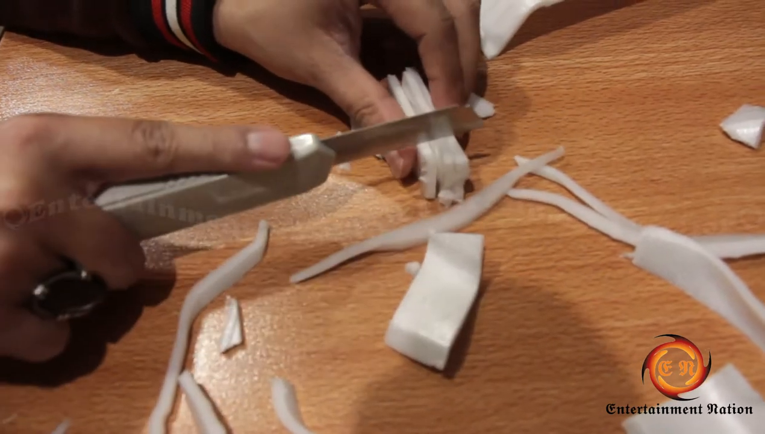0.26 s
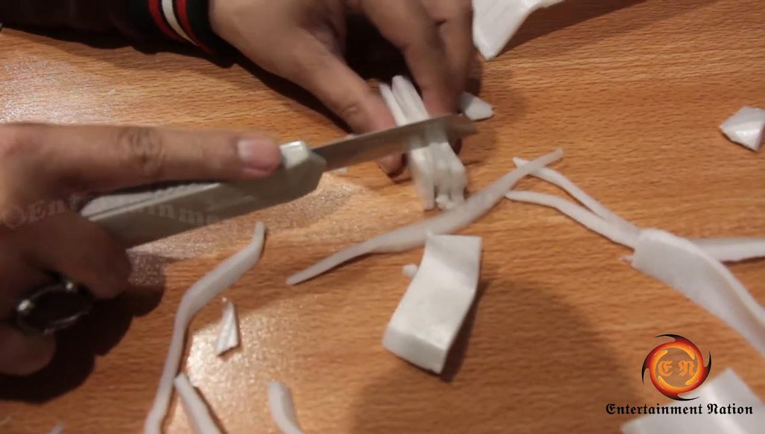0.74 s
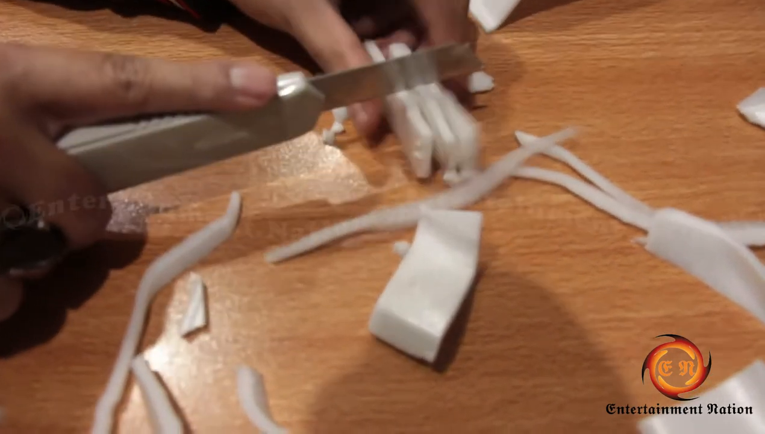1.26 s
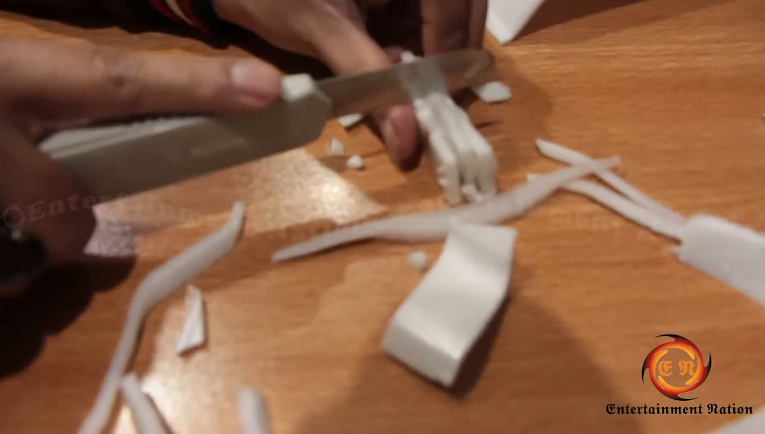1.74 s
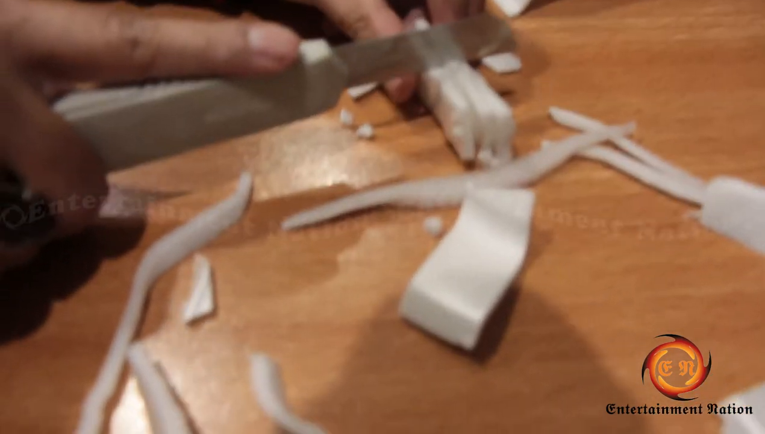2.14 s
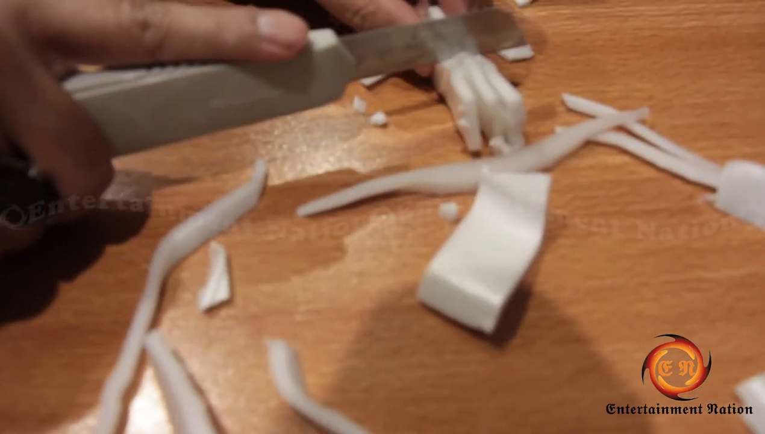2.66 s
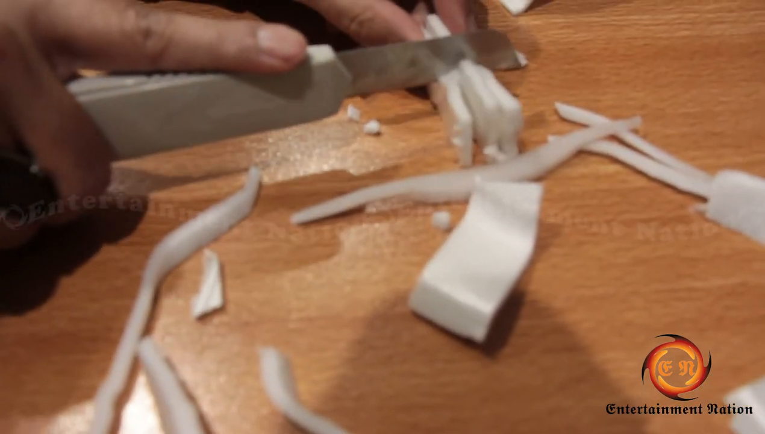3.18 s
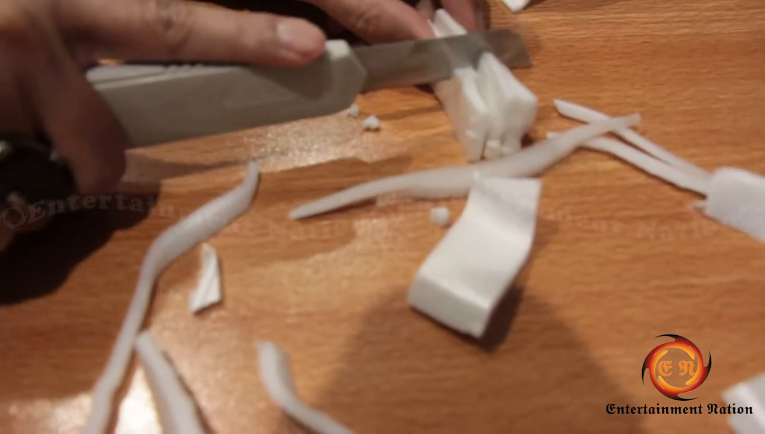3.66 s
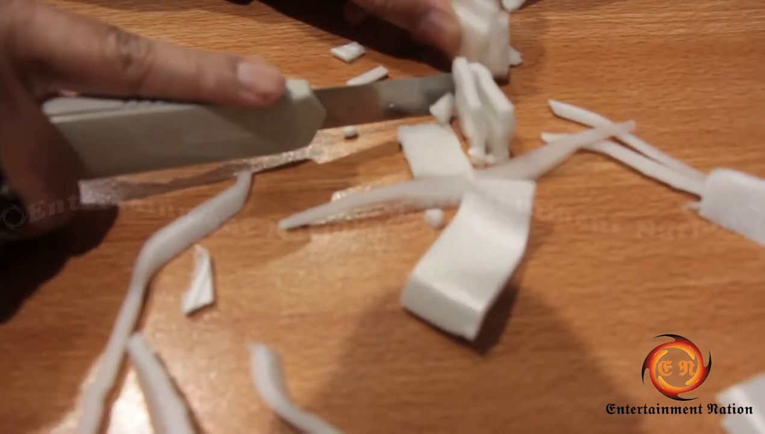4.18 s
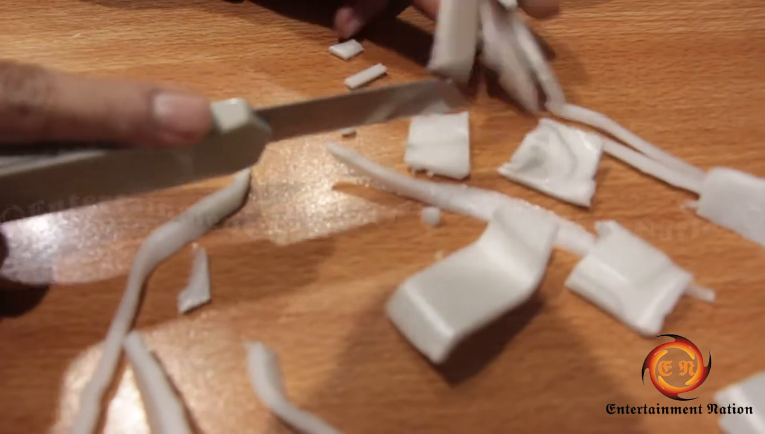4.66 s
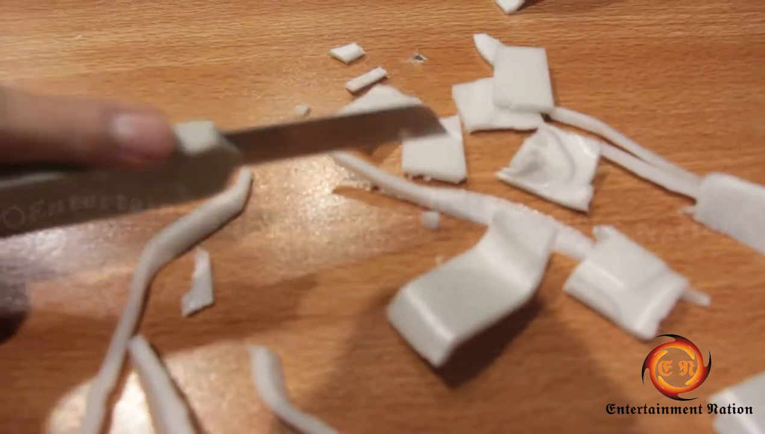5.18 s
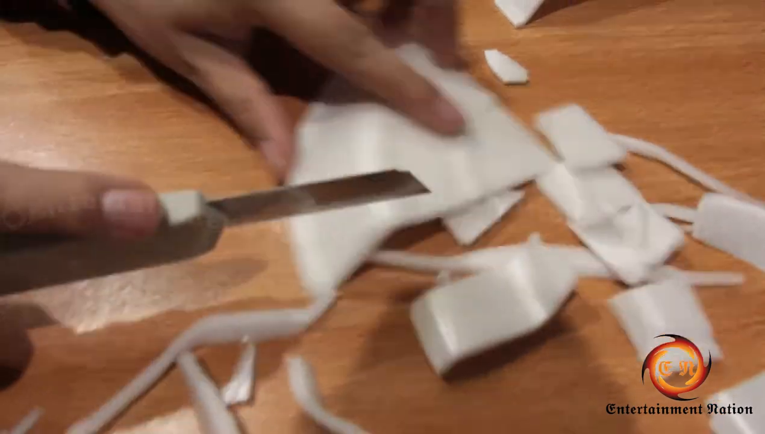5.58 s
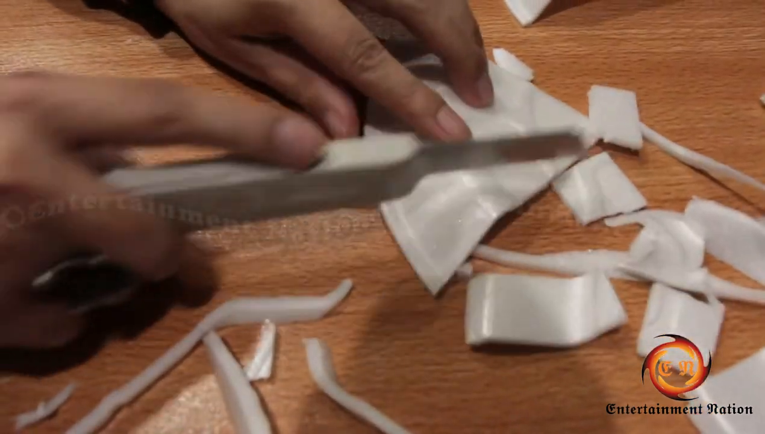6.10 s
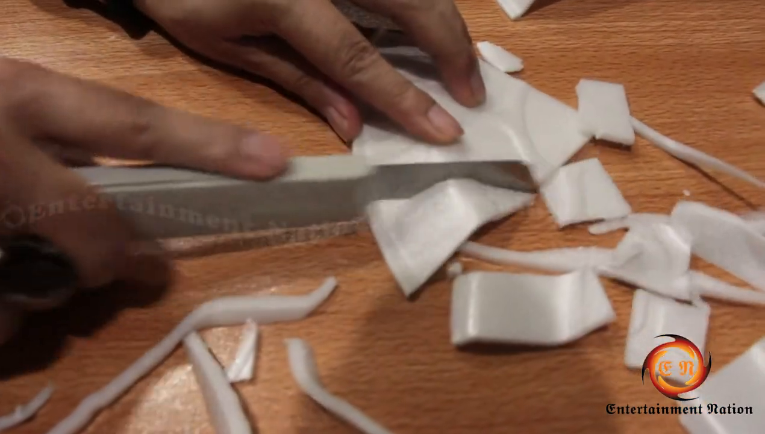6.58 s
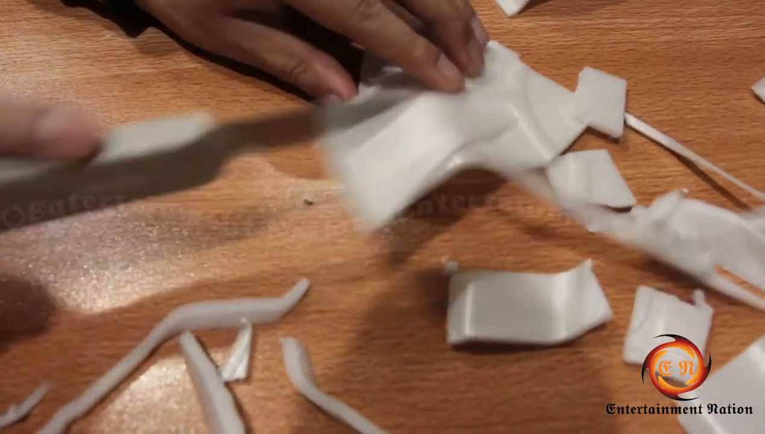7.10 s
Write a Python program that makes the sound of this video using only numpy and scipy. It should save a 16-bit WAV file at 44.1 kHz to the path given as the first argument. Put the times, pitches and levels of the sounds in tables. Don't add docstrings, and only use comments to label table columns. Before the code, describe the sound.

Close, dry foam cutting: small scrapes and ticks build to sharp snaps, a pause, then harsh squeaky rips through a plate, with soft table knocks.

```python
import sys
import numpy as np
from scipy import signal
from scipy.fft import rfft, irfft, next_fast_len
from scipy.io import wavfile
from scipy.ndimage import uniform_filter1d, map_coordinates

SR = 44100
rng = np.random.default_rng(int(sys.argv[2]) if len(sys.argv) > 2 else 0)


def magnitude_from_level(level_db):
    exponent = np.asarray(level_db, float) / 20
    return 10 ** exponent


def wav_record(signal):
    frames = np.transpose(np.atleast_2d(signal))
    bounded = np.clip(frames, -1, 1)
    quanta = np.round(bounded * 32767).astype(np.int16)
    wavfile.write(sys.argv[1], SR, quanta)


N = 323694

# pitch_hz, width_hz, level_db
TABLE_MODES = [(123.3, 20, 1.5), (240, 71, -5), (394, 17.3, -2), (566, 104, -9.5), (768, 97, -10),
               (1200, 260, -15)]


def unit(x):
    return x / np.sqrt(np.mean(x ** 2) + 1e-20)


def along(points, hz, order=1):
    cols = np.transpose(points)
    return np.interp(np.log(hz + 1), np.log(cols[0] + 1), cols[order])


def curves(rows):
    s, *cols = np.transpose(rows)
    return [np.interp(np.arange(N) / SR, s, c) for c in cols]


def wobble(rate):
    coarse = np.arange(0, N + 32, 32)
    knots = rng.standard_normal(int(N * rate / SR) + 8)
    return np.interp(np.arange(N), coarse, map_coordinates(knots, [coarse * rate / SR]))


def filtered(x, response):
    m = next_fast_len(x.shape[-1] + 2048)
    spectrum = rfft(x, m) * response(np.fft.rfftfreq(m, 1 / SR))
    return irfft(spectrum, m)[..., :x.shape[-1]]


def body(modes):
    def response(f):
        total = 0
        for k, (c, w, db) in enumerate(modes):
            total = total + (-1) ** k * magnitude_from_level(db) * 1j * f * w / (c * c - f * f + 1j * f * w)
        return total
    return response


def room_tone():
    # pitch_hz, density_db
    rumble_colour = [(25, -50), (42, -12.5), (90, -9), (150, -3.5), (240, -5.5), (330, -11), (450, -18.5),
                     (800, -29.5), (1500, -63)]
    t = np.arange(N) / SR
    hum = magnitude_from_level(-54.0 + 1.3 * wobble(6.5)) * np.sin(2 * np.pi * 120 * t + 0.64 * wobble(3.62))
    hum += magnitude_from_level(-77.5 + 1.5 * wobble(6.3)) * np.sin(2 * np.pi * 236 * t + 0.62 * wobble(9.2))
    noise = rng.standard_normal((3, N))
    shared = noise[0] + 0.78 * noise[1:]
    rumble = unit(filtered(shared, lambda hz: magnitude_from_level(along(rumble_colour, hz))))
    return hum + magnitude_from_level(-55.0 + 0.24 * wobble(4.73)) * rumble


def hiss():
    # pitch_hz, density_db
    hiss_colour = [(200, -34), (500, 3), (1500, -5), (4000, -10.5), (8000, -17.5), (13000, -22.5),
                   (16000, -27)]
    noise = rng.standard_normal((2, N))
    return magnitude_from_level(-56.0) * unit(filtered(noise, lambda hz: magnitude_from_level(along(hiss_colour, hz))))


def contact():
    # start_s, rub_db, fade_s (per 20 dB), lean_db, keen_db
    bites = [(0.186, -44, 0.13, 0, 2), (0.263, -40.5, 0.08, -2.5, 1), (0.375, -40, -0.27, -6, -7),
             (0.669, -42, 0.23, 3, -1.5), (1.073, -47, 0.06, 0, 13), (1.247, -45, 0.09, -6, 0),
             (1.502, -42, -0.6, 1, -6), (2.395, -44.5, 0.2, -5, -4), (2.54, -44.5, 0.13, -4.5, 4.5),
             (2.793, -41.5, 0.2, -7, -11.5), (2.951, -47, 0.5, -4, -7), (2.99, -34.5, 0.25, -13, -1),
             (3.199, -24, 0.1155, -13, 1), (3.431, -31.5, 0.11, -12.5, -6), (4.037, -33.5, 0.1876, 4, -2),
             (4.06, -37.5, 0.16, -1, -18), (4.324, -50.5, 0.2, 0.5, 6.5), (4.747, -63.5, 0.6, -14, 12.5),
             (6.25, -35, 0.16, -5, -12), (3.225, -49.5, 0.25, 5.5, 10.5), (4.605, -61.5, 0.34, -7, 17),
             (5.869, -41, .3, -2, -3), (6.787, -41, 0.27, -8, -3), (1.572, -48, 0.23, -7, 2),
             (3.609, -45.5, 0.22, -3.5, 1.5), (3.566, -43, 0.09, -3.5, 7), (6.222, -44.5, 0.34, 4, -11)]
    # peak_s, rub_db, rise_s, fade_s (both per 20 dB), lean_db
    draws = [(0, -62, .1, 0, 6), (.11, -55, 6, .07, -3.5), (.551, -47.5, 0.3, 0.2, -1.5),
             (.85, -46, 0.5, -0.1, -4), (.986, -56.5, 0.6, 0.5, -5.5), (1.17, -55.5, 0, 0.05, -2),
             (1.592, -47.5, 0.24, 0.3, -2.5), (1.825, -56, 0.5, -0.1, 3), (2.083, -43.5, 0.14, 0.1, -0.5),
             (2.327, -52, 0.37, 0.07, -1.5), (2.67, -49.5, 0, 0.1, -22.5), (3.17, -54, 0, 0, -9),
             (3.626, -39, 0, 0.04, -1), (3.801, -33, 0.04, 0.1351, -12), (3.971, -35, 0.13, 0.05, -12),
             (4.023, -14.5, 0.02, 0.0033, -7.5), (4.51, -59, 0.5, 0.24, -3)]
    # time_s, rub_db, lean_db
    long_pulls = [
        [(1.333, -51.5, 5), (1.355, -49, 1.5), (1.385, -53.5, 2), (1.43, -48, 3.5), (1.444, -49.5, 1),
         (1.46, -62, 8)],
        [(5.289, -41, 3), (5.36, -29.5, -1), (5.408, -32.5, -4.5), (5.57, -32, -2), (5.595, -28.5, -4),
         (5.608, -27, -2.5), (5.63, -32.5, -0.5), (5.7, -43.5, -1), (5.8, -68, -18)],
        [(5.9, -53, -7), (5.94, -36.5, 6.5), (6.0, -39.5, 2), (6.055, -39, 4.5), (6.075, -46, 3.5),
         (6.11, -51, 3), (6.2, -61, -6.5)],
        [(6.375, -54, -2), (6.405, -30, 2.5), (6.457, -37, -1), (6.581, -36, -1), (6.617, -29, 1),
         (6.645, -36, 2), (6.769, -35, 5), (6.797, -27.5, -1), (6.948, -39, 6)],
        [(6.945, -42, 9.5), (6.96, -42, 10.5), (7.004, -51.5, 11.5), (7.08, -44.5, 2.5), (7.172, -60, 2.5),
         (7.236, -69, 0), (7.339, -54.5, -6)],
    ]
    bite_s = .005
    usual_db, rest_db = -37.5, -81
    t = np.arange(0, N / SR + .01, .001)

    def ramp(s, db, rise, fade):
        return db - 20 * np.maximum((s - t) / max(rise, .002), (t - s) / max(fade, .01))

    moves = [(ramp(s, db, bite_s, fade), lean, keen) for s, db, fade, lean, keen in bites]
    moves += [(ramp(s, db, rise, fade), lean, 0) for s, db, rise, fade, lean in draws]
    for s, db, lean in map(np.transpose, long_pulls):
        level = np.interp(t, [s[0] - bite_s, *s, s[-1] + bite_s], [-120, *db, -120])
        moves.append((level, np.interp(t, s, lean), 0))

    power = magnitude_from_level(2 * rest_db)
    for db, lean, keen in moves:
        fizz = usual_db + 1.11 * (db - usual_db) - 7 + 0.21 * lean + keen
        drag = usual_db + 0.81 * (db - usual_db) - 8 + lean + 0.25 * keen
        power = power + magnitude_from_level(2 * np.array([db, db + lean, fizz, drag]))
    return curves(np.transpose([t, *10 * np.log10(power)]))


def slips(rate, life, spread_db, smooth):
    turns = np.cumsum(rate * magnitude_from_level(2.8 * wobble(40)) / SR)
    at = np.diff(np.floor(turns), prepend=0)
    sizes = at * magnitude_from_level(spread_db * rng.standard_normal(N))
    u = np.arange(SR // 40) / SR / life
    return smooth + unit(signal.fftconvolve(sizes, u * np.exp(-u))[:N])


def rub(force, colour, own_db, patchy_db):
    tearing = force * magnitude_from_level(own_db * wobble(70)) * rng.standard_normal(N)
    hz, t, z = signal.stft(tearing, SR, nperseg=512)
    patches = uniform_filter1d(uniform_filter1d(rng.standard_normal(z.shape), 2, 0), 9, 1)
    gain = colour(hz[:, None], t) * magnitude_from_level(patchy_db * unit(patches))
    gain /= np.sqrt(np.mean(np.abs(gain) ** 2, axis=0))
    return unit(signal.istft(z * gain, nperseg=512)[1][:N])


def sawing():
    # multiple_of_centre, width (same unit), level_db
    strip_modes = [(1, 0.13, 2), (1.4, 0.55, -0.5), (1.9, 0.99, -4)]
    plate_modes = [(.8, 0.28, -6.5), (1, 0.12, 4.5), (1.3, 0.39, -4)]
    drag_modes = [(.7, 0.54, -10), (1, 0.18, 1), (1.27, 0.21, -3.5)]
    # pitch_hz, density_db
    fizz_colour = [(4410, -10.5), (7500, -1.5), (10400, -3.5), (15300, -24), (16100, -26), (16500, -49)]
    # time_s, strips_hz, plate_hz, drag_hz
    stack_sizes = [(0, 3900, 2380, 1300), (.75, 3910, 2340, 1390), (2.1, 4270, 2610, 1370),
                   (2.8, 3650, 2460, 1250), (3.05, 3520, 2650, 1180), (3.22, 3700, 2750, 880),
                   (3.36, 3800, 2930, 920), (3.45, 3720, 2600, 1060), (3.75, 3860, 2520, 1210),
                   (4.0, 3900, 2490, 1230), (4.06, 3180, 2300, 1480), (4.24, 3240, 1770, 1340),
                   (4.4, 3780, 2410, 1200)]
    plate_sizes = [(5.3, 3500, 2620, 1260), (5.37, 3540, 2430, 1280), (5.42, 3350, 2470, 1300),
                   (5.55, 3500, 2300, 1440), (5.61, 3200, 2100, 1480), (5.7, 3080, 2520, 1450),
                   (5.93, 3240, 2240, 1490), (6.1, 3660, 2100, 1490), (6.4, 3520, 2860, 1300),
                   (6.45, 3930, 2760, 1350), (6.6, 4300, 2250, 1420), (6.8, 4120, 2440, 1320),
                   (7.0, 4000, 2200, 1420), (7.06, 3870, 2620, 1370), (7.15, 3780, 2500, 1300)]
    rub_db, plate_db, fizz_db, drag_db = contact()
    force = slips(rate=190, life=0.0025, spread_db=3.0, smooth=1.15)
    s, strips_hz, plate_hz, drag_hz = np.transpose(stack_sizes + plate_sizes)

    def moving(modes, centre):
        return lambda hz, t: body(modes)(hz / np.interp(t, s, centre))

    out = magnitude_from_level(rub_db) * rub(force, moving(strip_modes, strips_hz), own_db=1.5, patchy_db=2.5)
    out += magnitude_from_level(plate_db) * rub(force, moving(plate_modes, plate_hz), own_db=2.0, patchy_db=2.0)
    drag = magnitude_from_level(drag_db) * rub(force, moving(drag_modes, drag_hz), own_db=1.6, patchy_db=2.1)
    out += drag + magnitude_from_level(17.0) * filtered(drag, body(TABLE_MODES[2:3]))
    fizz = rub(force, lambda hz, t: magnitude_from_level(along(fizz_colour, hz)), own_db=3.0, patchy_db=2.0)
    out += magnitude_from_level(fizz_db) * fizz
    return magnitude_from_level(-0.5) * out


def pips():
    # start_s, peak_db, pitch_hz, t60_s
    flaps = [(4.082, -26.5, 2100, .02), (0.013, -52, 1140, 0.29), (4.43, -42, 2490, 0.038),
             (4.445, -51, 2460, .04), (6.399, -25.5, 3030, 0.026), (6.7564, -27, 2290, 0.027),
             (6.7719, -21, 2260, 0.021), (6.7864, -20.5, 2200, 0.042), (6.817, -22, 2260, 0.043),
             (6.8632, -22.5, 2120, 0.023), (6.902, -38, 2350, .04), (6.951, -28, 2340, 0.064),
             (6.962, -28, 2330, .04), (7.0582, -18, 2800, 0.0089), (7.065, -34, 2730, 0.023),
             (7.101, -37, 2550, 0.022), (2.067, -39, 3140, .025), (2.55, -46.5, 1620, 0.098),
             (3.987, -44, 1260, .04), (4.16, -45, 3300, .12)]
    out, t = np.zeros(N + SR), np.arange(SR // 12) / SR
    for s, db, hz, t60 in flaps:
        drift = 0.081 * np.cumsum(rng.standard_normal(len(t)))
        envelope = magnitude_from_level(-60 * t / max(t60, .005)) * (1 - magnitude_from_level(-60 * t / 0.007))
        pip = envelope * np.sin(2 * np.pi * hz * t + drift)
        out[round(s * SR):][:len(t)] += magnitude_from_level(db) * pip / np.abs(pip).max()
    return out[:N]


def snaps():
    # start_s, peak_db, ring_hz, dull_db (re peak)
    saw_snaps = [(.1839, -30, 4120, -15), (.1994, -27.5, 4060, -22), (.2622, -15.5, 2300, -15),
                 (.369, -29.5, 4330, -14), (.3894, -32.5, 4140, -10), (.5002, -27, 4170, -19),
                 (.7637, -26.5, 2470, -7), (1.072, -32, 4530, -7), (1.2395, -21, 2330, -25),
                 (1.498, -27.5, 3230, -16), (1.6795, -27, 3420, -16), (1.6916, -26, 3300, -17.5),
                 (1.9539, -36, 7200, -18), (1.9863, -29, 6100, -28), (2.0357, -29, 4800, -13),
                 (2.0832, -24.5, 5110, -5), (2.1026, -24.5, 2580, -16), (2.329, -30, 2500, -16),
                 (2.39, -21, 4870, -19), (2.5355, -25, 5630, -20), (2.6578, -29.5, 3900, -31),
                 (2.788, -24, 5930, -35), (2.7989, -20, 6000, -36), (2.8063, -23.5, 6050, -26),
                 (2.8603, -25.5, 4570, -15)]
    break_snaps = [(2.778, -43, 6040, -28), (2.917, -38, 6000, -30), (2.9466, -23, 4520, -18),
                   (2.96, -28, 5000, -23), (2.968, -24, 5500, -20), (2.991, -16, 5000, -16),
                   (3.049, -28, 4500, -26), (3.345, -28, 3900, -16), (3.594, -28, 2600, -13),
                   (3.621, -31, 5000, -18), (3.82, -24, 4380, -14), (3.833, -21, 4560, -12),
                   (3.859, -25, 3830, -18), (3.871, -39, 4020, -18), (3.9628, -36, 4520, -20),
                   (3.9812, -20, 3620, -15), (4.2342, -35, 5350, -13), (4.264, -36, 5000, -21),
                   (4.355, -33, 2470, 3), (4.392, -39, 4500, -23), (4.4866, -38.5, 4160, -20),
                   (2.982, -3, 5000, -30.5), (3.1929, -1.5, 3920, -24), (3.2074, -3.5, 3700, -21),
                   (3.265, -19.5, 4180, -18), (3.414, -30, 4000, -43), (3.4255, -9, 3800, -26),
                   (3.7797, -14.5, 3680, -20.5), (3.898, -19, 3880, -19.5), (3.9309, -20.5, 3970, -25),
                   (4.0092, -5, 3750, -20), (4.249, -35, 2440, -8.5), (4.318, -30.5, 2380, 11),
                   (4.5016, -28, 4800, -8), (4.543, -41, 4200, -21.5), (4.7425, -34, 5800, 0),
                   (4.765, -38, 5000, 1), (4.798, -42, 9050, -29)]
    plate_snaps = [(5.2848, -20.5, 2850, -14), (5.3614, -14.5, 3210, -9), (5.4156, -20, 3540, -29),
                   (5.488, -32, 3520, -15), (5.5867, -14, 2510, -30), (6.2461, -10, 4970, -13),
                   (6.2495, -11, 3150, -15), (6.3853, -22, 2920, -16), (6.4064, -16, 4200, -17),
                   (6.4132, -15, 3030, -26), (6.4895, -14.5, 4330, -20), (6.6148, 0, 2240, -10.5),
                   (6.617, -6.5, 2100, -3), (6.7236, -16.5, 2100, -24), (6.788, -14.5, 5000, -25),
                   (6.5165, -19, 6500, -11), (6.797, -10, 3400, -32), (6.8087, -12, 2260, -25),
                   (6.8364, -12, 3880, -38), (7.0573, -24, 4200, -32), (7.3047, -36.5, 4680, -7)]
    # start_s, peak_db, ring_hz, dull_db (re peak)
    keen_snaps = [(1.0799, -30.5, 2540, -6), (1.088, -39, 4000, -8), (1.1612, -34.5, 4400, -20),
                  (1.17, -34.5, 3000, -12), (1.181, -38, 4000, -13), (1.3503, -32, 2500, -1),
                  (1.491, -31.5, 8800, -11), (1.67, -42, 5000, -24), (3.105, -32, 4030, -15),
                  (3.203, -32, 4000, -29), (3.217, -24, 4500, -22), (3.394, -38, 5000, -22),
                  (3.492, -29, 4000, -25), (3.51, -31, 5000, -22), (3.5612, -21, 3950, -16),
                  (3.6041, -20.5, 2400, -27), (3.6341, -24.5, 3820, -13), (3.771, -27, 4000, -23),
                  (3.8037, -15.5, 4030, -18), (3.9413, -21, 4500, -17.5), (5.3442, -16, 6260, -20),
                  (6.136, -28, 3020, -10), (6.24, -26, 2500, -8), (6.322, -32, 3000, -6),
                  (6.6, -16, 7000, -7), (6.6108, -13, 6040, -9), (7.012, -25, 8500, -12),
                  (2.194, -35, 2600, -14), (2.263, -38, 5000, -15), (2.339, -37, 4500, -16),
                  (2.385, -36, 4700, -22), (2.434, -35, 5000, -18), (2.452, -34, 5550, -20),
                  (2.545, -31, 3800, -20)]
    blunt_snaps = [
        (4.0284, -3.5, 3700, -17),
        (4.0352, -2, 2330, -11),
        (5.6046, -27, 3220, -19),
        (5.609, -22, 2180, -22),
        (5.682, -24.5, 2150, -13),
        (5.92, -14.5, 2170, -19.5),
        (5.9251, -11, 2330, -8),
        (6.7037, -14, 2510, -12),
        (7.0218, -22, 1700, 1),
    ]
    chatter_s, chatter_gap_s = 3.1185, .0084
    skips = [(chatter_s + k * chatter_gap_s, -30, 3700, -15) for k in range(8)]
    runs = [(saw_snaps, -9, -6), (break_snaps + skips, -17, -1.5), (plate_snaps, -17.5, -10),
            (keen_snaps, -7, -4), (blunt_snaps, -23, -10.5)]

    t = np.arange(SR // 25) / SR
    shape = magnitude_from_level(-60 * t / 0.0065) + 0.15 * magnitude_from_level(-60 * t / 0.04)
    shape *= 1 - magnitude_from_level(-60 * t / 0.00077)
    shape += .5 * np.interp(t - .0017, t, shape, left=0)

    def edge(f):
        return 1j * f / (700 + 1j * f) / (1 + 1j * f / 12000) ** 2

    out = np.zeros(N + SR)
    for rows, top_db, over_db in runs:
        for s, db, hz, dull_db in rows:
            bright_db = top_db + 0.37 * (db + 19.0) + 6.7 * np.log2(hz / 3500)
            piece = body([(1500, 1200, dull_db + 5.5), (hz, 0.12 * hz, 1.5),
                          (1.536 * hz, 0.5 * hz, over_db), (9000, 4500, bright_db + 4.5)])
            tear = shape * rng.standard_normal(len(t))
            tear[8] += 1.6
            crack = filtered(tear, lambda f: piece(f) * edge(f))
            crack /= 3.49 * np.std(crack[:SR // 200])
            out[round((s + .001) * SR):][:len(t)] += magnitude_from_level(db - 1.0) * crack
    return out[:N]


def knocks():
    # start_s, peak_db, thud_db (re peak), rattle_t60_s
    blows = [(1.073, -34.5, -12, 0.18), (4.024, -36, 0, 0.17), (4.035, -19, -13.5, 0.15),
             (4.078, -25, -13, 0.34), (4.114, -28, -5, 0.23), (4.2, -46, 3.5, 0.45),
             (4.318, -30.5, -28, 0.39), (5.285, -20, -15, 0.18), (5.309, -20, -14, 0.14),
             (5.329, -39, -12, 0.13), (5.359, -31.5, -3.5, 0.087), (5.921, -23.5, -21, 0.098),
             (6.246, -31.5, -30, 0.1), (6.613, -28.5, -7.5, 0.015), (7.057, -37, -15, 0.07)]
    tap, thud, t = np.zeros(N + SR), np.zeros(N + SR), np.arange(SR // 4) / SR
    for s, db, thud_db, rattle in blows:
        blow = 0.053 * magnitude_from_level(-60 * t / max(rattle, .01)) * rng.standard_normal(len(t))
        blow[0] = 1
        tap[round((s + .002) * SR):][:len(t)] += magnitude_from_level(db + 38.5) * blow
        thud[round(s * SR):][:len(t)] += magnitude_from_level(db + thud_db + 48.5) * blow
    upper = body(TABLE_MODES[2:])
    tap = filtered(tap[:N], lambda hz: upper(hz) / (1 + 1j * hz / 1500))
    return tap + filtered(thud[:N], body(TABLE_MODES[:2]))


def bumps():
    # start_s, level_db, t60_s
    pushes = [
        (1.24, -60, 0.13),
        (4.03, -47, .3),
        (4.3, -50, .2),
        (6.612, -42, 0.071),
    ]
    legs_hz = 62
    t, out = np.arange(N) / SR, np.zeros(N)
    for s, db, t60 in pushes:
        after = np.maximum(t - s, 0)
        out += magnitude_from_level(db - 60 * after / max(t60, .02)) * np.sin(2 * np.pi * legs_hz * after)
    return out


def squeak():
    # time_s, pitch_hz, level_db
    glide = [(3.732, 520, -78), (3.742, 627, -62), (3.754, 896, -56), (3.763, 1117, -49),
             (3.777, 1263, -47), (3.797, 1142, -46), (3.82, 1267, -52), (4.0, 1277, -57), (4.03, 1314, -84)]
    hz, db = curves(glide)
    turn = 2 * np.pi * np.cumsum(hz * (1 + 0.022 * wobble(300))) / SR
    tone = np.sin(turn) + 0.8 * np.sin(2 * turn) + 0.61 * np.sin(3 * turn) + 0.2 * np.sin(4 * turn)
    return magnitude_from_level(db + 3.5 * wobble(90) + 1.5) * tone


def echoes(x, t60, delay):
    hz, t, z = signal.stft(rng.standard_normal((2, SR // 2)), SR, nperseg=128)
    tail = signal.istft(z * magnitude_from_level(-60 * t / t60(hz)[:, None]), SR, nperseg=128)[1]
    tail /= np.linalg.norm(tail[0])
    late = np.pad(x, (round(delay * SR), 0))
    return signal.fftconvolve(late[None], tail, axes=1)[:, :N]


def scatter(x):
    hop, t = SR // 20, np.arange(SR // 80) / SR
    out, fade, padded = np.zeros(N + SR), np.hanning(2 * hop), np.pad(x, (hop, SR))
    for start in range(0, N + hop, hop):
        path = rng.standard_normal(len(t)) * magnitude_from_level(-60 * t / 0.011) * (t > .0004)
        piece = signal.fftconvolve(padded[start:start + 2 * hop] * fade, path / np.linalg.norm(path))
        out[start:start + len(piece)] += piece
    near = filtered(out[hop:hop + N], lambda hz: 1j * hz / (4500 + 1j * hz))
    return np.array([near, -near])


def ports(x):
    # pitch_hz, level_db, phase_rad
    balance = [(60, -9.5, -0.73), (355, -5, -0.78), (970, -6.5, 0.7), (2100, -6, -0.74), (5000, -4, -0.51),
               (15000, -3.5, 0.72)]
    side = np.array([[.5], [-.5]])

    def response(hz):
        return magnitude_from_level(side * along(balance, hz)) * np.exp(-1j * side * along(balance, hz, order=2))

    return filtered(x, response)


def scene():
    # pitch_hz, t60_s
    decay = [(200, 0.51), (2000, 0.4), (12000, 0.016)]
    work = sawing() + pips() + snaps() + knocks() + bumps() + squeak()
    room = magnitude_from_level(-16) * echoes(work, lambda hz: along(decay, hz), delay=.006)
    heard = magnitude_from_level(-.5) * work + magnitude_from_level(-1.5) * scatter(work) + room + room_tone()
    return ports(heard) + hiss()


def band_limit(x):
    return signal.sosfilt(signal.butter(12, 16870, fs=SR, output="sos"), x)


def record(dry):
    def edge(hz):
        return magnitude_from_level(np.interp(hz, [15600, 16000, 16800, 16900], [0, -26, -34, -90]))

    mix = filtered(np.clip(dry, -1.05, 1.05), edge)
    return band_limit(mix)


dry = scene()
out = record(dry)
wav_record(out)
```